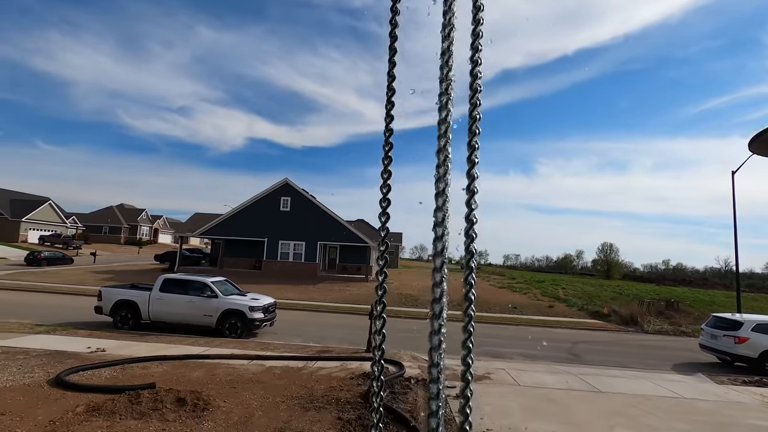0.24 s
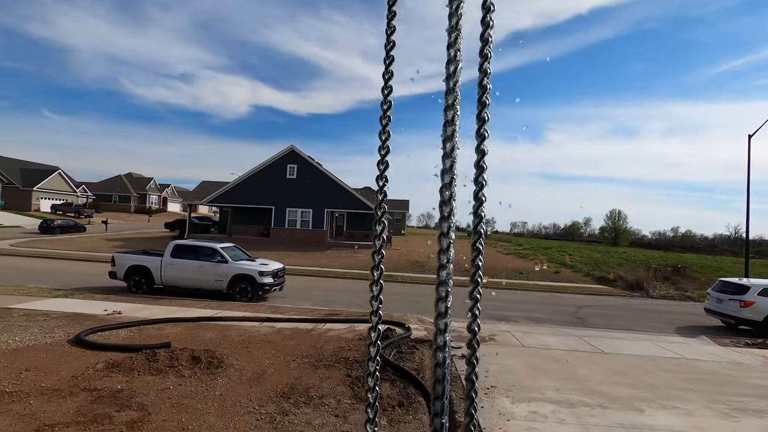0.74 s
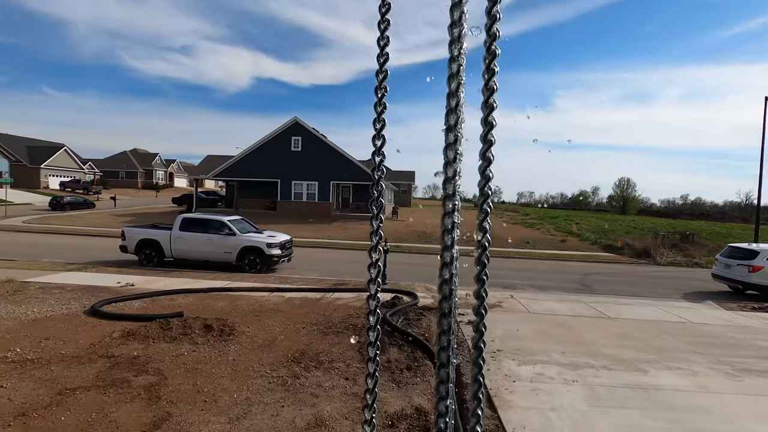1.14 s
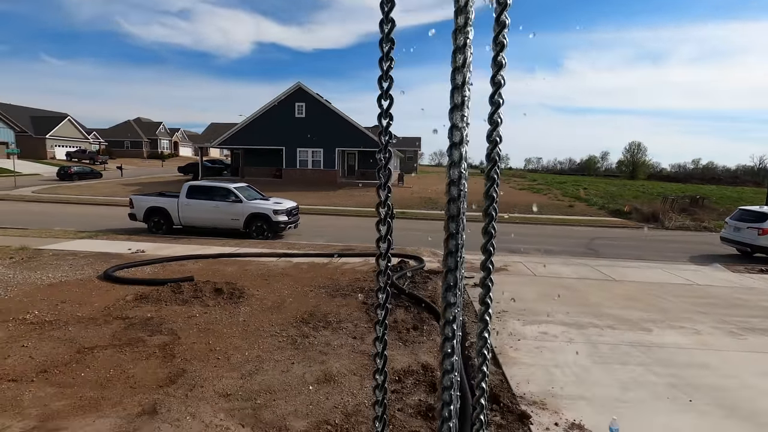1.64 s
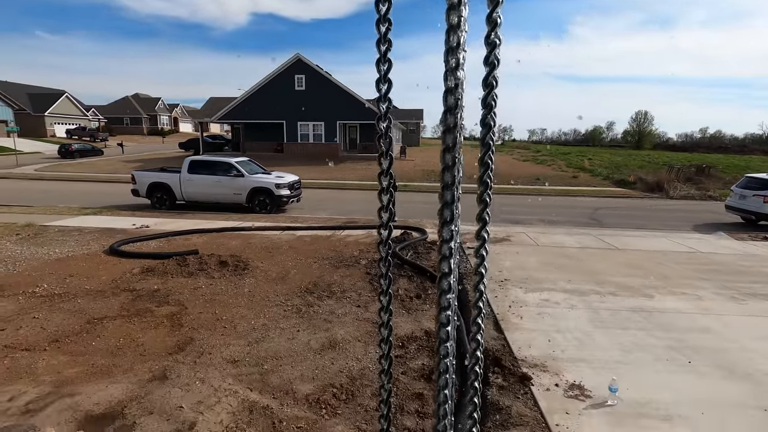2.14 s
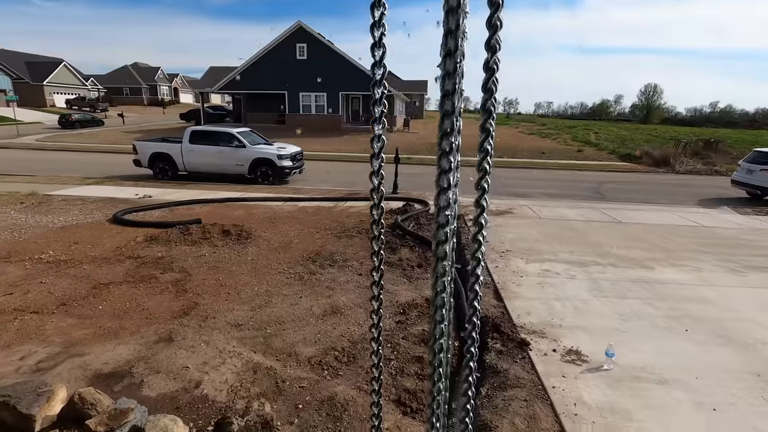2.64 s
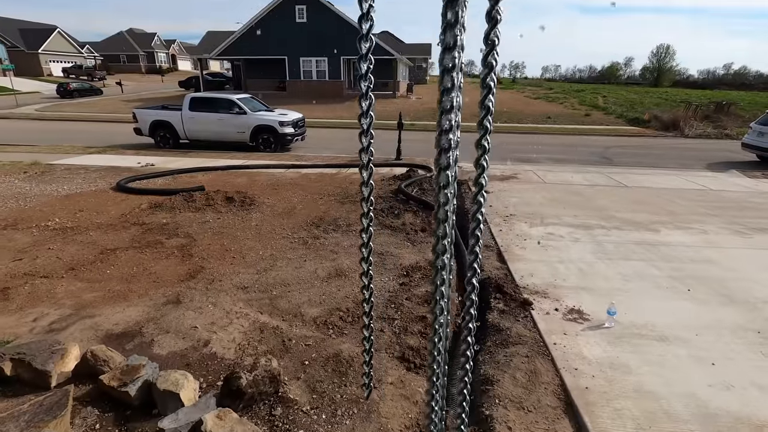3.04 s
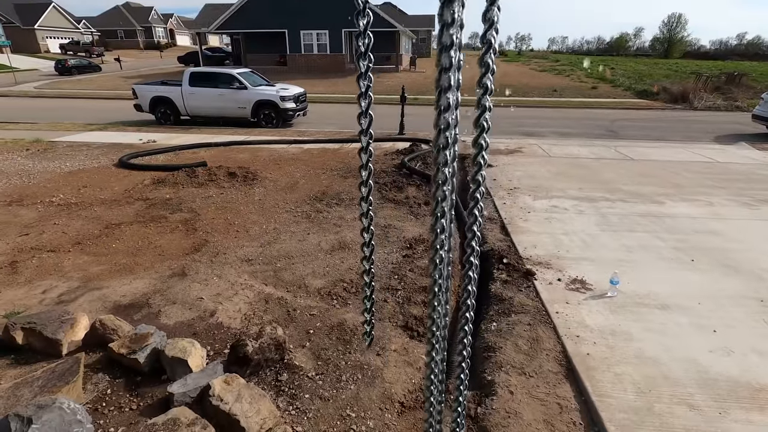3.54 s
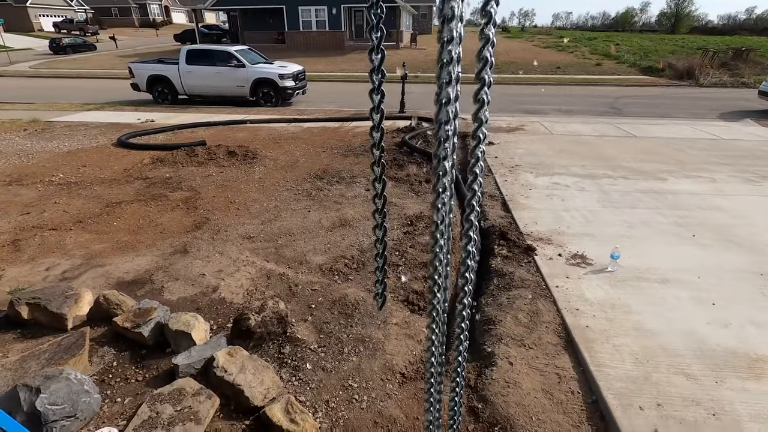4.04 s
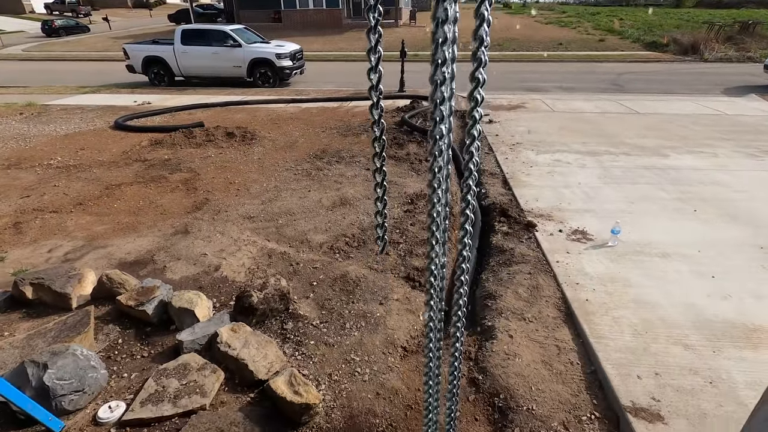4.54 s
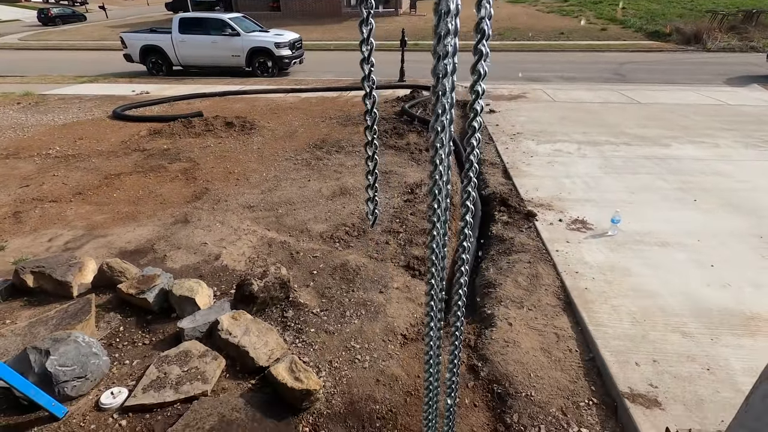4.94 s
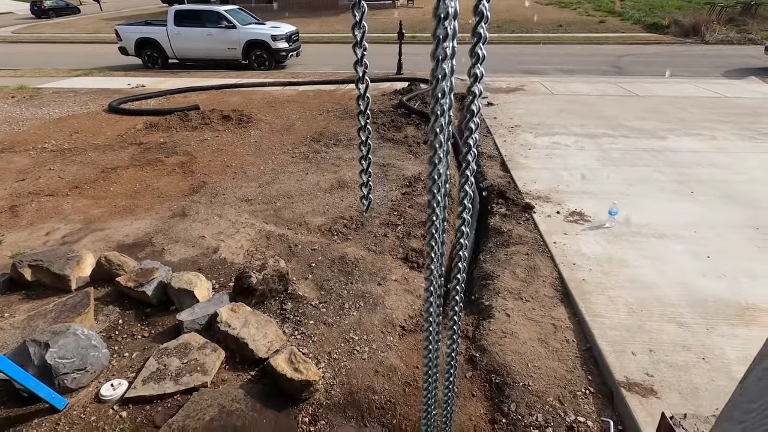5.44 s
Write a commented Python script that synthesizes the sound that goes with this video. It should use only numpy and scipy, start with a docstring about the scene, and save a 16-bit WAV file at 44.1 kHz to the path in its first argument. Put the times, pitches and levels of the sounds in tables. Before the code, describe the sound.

Close watery patter of crisp drop clicks, bubbly plinks and soft hissing spray, a hollow gutter gurgle fading beneath wind bumps.

```python
"""Drops smack on stone, small bubbles plink in puddles, fine spray hisses and a hollow trough gurgles:
water runs from a gutter down hanging chains outdoors, close to a hand-held camera and its microphone.
Drops are clicks with short rings, bubbles are rising tones, spray is filtered ticks, the trough is
splashes through resonances. Spray and trough weaken as the camera tilts down. Wind pushes on the
microphone as low noise and single swings, and a last gust rustles; far splashing lies behind it all."""
import sys
import numpy as np
from scipy import signal
from scipy.fft import rfft, irfft, next_fast_len
from scipy.io import wavfile
from scipy.ndimage import uniform_filter1d

SR = 44100
rng = np.random.default_rng(int(sys.argv[2]) if len(sys.argv) > 2 else 0)


def generate_wav(signal):
    """Clip the signal to [-1, 1] and save it as 16-bit WAV at the path in sys.argv[1]."""
    frames = np.transpose(np.atleast_2d(signal))
    scaled = np.clip(frames, -1, 1) * 32767
    pcm = np.round(scaled).astype(np.int16)
    wavfile.write(sys.argv[1], SR, pcm)


N = 251799


def gain_of(db):
    """Turns decibels into an amplitude factor."""
    return 10 ** (np.asarray(db) / 20)


def evened(x):
    """Scales a sound to rms 1."""
    return x / np.sqrt(np.mean(x ** 2) + 1e-20)


def coloured(x, points):
    """Filters x by (freq_hz, level_db) points joined on a log frequency axis."""
    point_hz, point_db = np.transpose(points)
    size = next_fast_len(len(x))
    hz = np.fft.rfftfreq(size, 1 / SR)
    level_db = np.interp(np.log(hz + 1), np.log(point_hz + 1), point_db)
    return irfft(rfft(x, size) * gain_of(level_db), size)[:len(x)]


def ring(x, hz, width_hz):
    """Passes x through a two-pole resonance of peak gain 1."""
    b, a = signal.iirpeak(hz, hz / width_hz, SR)
    return signal.lfilter(b, a, x)


def wobble(seconds, depth_db):
    """Random level changes of about this length, as a gain with this rms depth."""
    width = max(int(seconds * SR), 2)
    slow = uniform_filter1d(rng.standard_normal(N), width)
    slow = uniform_filter1d(slow, width)
    return gain_of(depth_db * evened(slow))


def taps(per_s, spread_db):
    """Random one-sample clicks, most small and a few large."""
    heights = gain_of(spread_db * np.minimum(rng.exponential(1, N), 4))
    return heights * (rng.random(N) < per_s / SR)


def add(mix, s, sound):
    """Lays a sound into the mix from time s."""
    part = mix[round(s * SR):][:len(sound)]
    part += sound[:len(part)]


def curve(table):
    """Reads a (time_s, value) table for every sample."""
    return np.interp(np.arange(N) / SR, *np.transpose(table))


def swells(s, height, half_s):
    """Adds up bell-shaped swells centred on times s, computed every 64 samples."""
    t = np.arange(0, N + 64, 64) / SR
    bells = height * np.exp(-((t[:, None] - s) / half_s) ** 2)
    return curve(np.transpose([t, bells.sum(1)]))


# spectrum of far splashing and open air: freq_hz [Hz], level_db [relative dB per Hz]
AIR_SPECTRUM = [(35, -29), (60, -1), (172, -0.5), (281, -6.5), (515, 1), (732, -9), (1200, -5.5),
                (1410, -20), (1740, 0.5), (3940, -4.5), (6900, -9.5), (14200, -16.5), (16000, -19)]
AIR_DB = -39  # rms level


def far_air():
    """Splashes too far off to tell apart blend with open air into a steady noise."""
    return gain_of(AIR_DB) * evened(coloured(rng.standard_normal(N), AIR_SPECTRUM))


# how far the camera points down, away from the gutter: time_s [s], tilt [share 0-1]
CAMERA_TILT = [(0, 0), (1.9, 0), (2.3, 0.42), (3.8, 0.67), (4.0, 0.93), (4.8, 0.5), (5.35, 1.0),
               (5.71, 0.96)]
# filter shaping the hiss of droplets: freq_hz [Hz], level_db [relative dB]
SPRAY_COLOUR = [(1470, 12), (2500, 1.5), (4370, -4), (6920, -3.5), (13900, -14), (15200, -8.5),
                (16000, -45)]
SPRAY_DB, SPRAY_LOSS_DB = -36, 5.  # level looking up, and what full tilt takes away


def spray():
    """Thousands of tiny droplets burst each second; low, middle and high ones clump on their own."""
    out = np.zeros(N)
    for hz in (3500, 7000, 12500):
        ticks = taps(per_s=6000, spread_db=2.0) * rng.standard_normal(N)
        ticks = ticks * wobble(0.0072, 2.85) * wobble(0.025, 1.0)
        out += evened(ring(ticks, hz, 0.54 * hz)) * (hz / 7000) ** .5
    level_db = SPRAY_DB - SPRAY_LOSS_DB * curve(CAMERA_TILT)
    return gain_of(level_db) * evened(coloured(out, SPRAY_COLOUR))


# hollow air modes of the gutter: pitch_hz [Hz], width_hz [Hz], level_db [relative dB]
TROUGH_MODES = [(408, 107, 0.5), (558.6, 57, 2), (669.4, 50, 1), (846, 62, 1), (1125, 81, 3.5),
                (1250, 94, 2)]
# surges of gurgling: centre_s [s], rise_db [dB over the steady level], half_s [half length, s]
GURGLE_SURGES = [(.0, 2.5, 0.032), (0.124, 3.5, 0.025), (0.216, 5.5, 0.029), (.53, 6., 0.094),
                 (1.06, 5, .07), (1.536, 4.5, 0.079), (1.906, 6.5, 0.083), (2.55, 3, 0.13), (4.48, 5., .05),
                 (4.837, 8., .035), (5.6, 7.5, .1)]
TROUGH_DB, TROUGH_LOSS_DB = -43, 12.5  # steady level looking up, and what full tilt takes away


def trough():
    """Splashes inside the gutter excite its hollow air modes, with surges of gurgling."""
    splashes = taps(per_s=1400, spread_db=2.0) * rng.standard_normal(N) * wobble(0.035, 1.85)
    hollow = np.zeros(N)
    for hz, width_hz, db in TROUGH_MODES:
        each_hz = 1.68 * width_hz  # two passes together are narrower than each
        mode = ring(ring(splashes, hz, each_hz), hz, each_hz)
        hollow += gain_of(db) * evened(mode)
    hollow = coloured(hollow, [(230, -13), (370, -2.5), (1500, -3)])  # too narrow a trough to sound low
    level_db = TROUGH_DB - TROUGH_LOSS_DB * curve(CAMERA_TILT) + swells(*np.transpose(GURGLE_SURGES))
    return gain_of(level_db) * evened(hollow)


# spectra of slow lumps, flutter and the last rustle: freq_hz [Hz], level_db [relative dB per Hz]
LUMP_SPECTRUM = [(1.2, -37), (2.0, 5), (16, -1.5), (25, -15), (48, -24), (60, -45), (78, -72), (130, -120)]
FLUTTER_SPECTRUM = [(18, -13), (30, -5), (59, -17.5), (92, -20), (135, -17), (198, -36), (300, -39),
                    (390, -65), (660, -120)]
RUSTLE_SPECTRUM = [(47, -33), (80, 0), (156, -3), (369, -15.5), (493, -11), (718, -19), (858, -13),
                   (1820, -7), (2660, -13.5), (7050, -18), (16000, -29)]
# gusts on the microphone, added to the calm level:
# centre_s [s], lumps_db [dB], flutter_db [dB], half_s [half length, s]
MIC_GUSTS = [(0.032, -25.5, -47, 0.08), (.35, -37, -44.5, 0.19), (0.663, -35, -37, 0.069),
             (0.796, -25, -26.5, 0.038), (0.922, -25, -33, 0.066), (1.07, -38, -42, 0.064),
             (1.27, -28, -62, 0.076), (1.596, -37, -47, 0.089), (1.93, -25.5, -44, 0.047),
             (2.253, -29, -39.5, 0.097), (2.633, -22.5, -46.5, 0.079), (2.818, -28, -38, 0.074),
             (3.21, -33.5, -65, 0.05), (3.6, -31, -43, .04), (3.715, -32, -42, 0.037),
             (3.843, -39, -44, .1), (4.5, -34, -57, 0.067), (4.917, -55, -46, 0.037)]
# single pushes: first_peak_s [s], level_db [dB], pitch_hz [Hz], direction [+1 dips first, -1 rises first]
MIC_PUSHES = [(0.666, -20, 37, 1), (0.777, -9, 41, 1), (0.835, -17.5, 30, 1), (0.944, -26, 65, 1),
              (1.051, -33, 130, 1), (3.0874, -25.5, 310, 1), (3.094, -27.5, 114, -1), (4.923, -26, 123, 1),
              (4.935, -32, 120, 1), (5.619, -17.5, 63, 1), (5.636, -17, 152, -1), (5.637, -12.5, 13, -1)]
CALM_LUMPS_DB, CALM_FLUTTER_DB = -37.5, -51.5
RUSTLE_S, RUSTLE_ATTACK_S = 5.614, 0.0043
RUSTLE_DB, RUSTLE_FADE_DB_PER_S = -26, 62  # level before the fade, which runs from the start


def push(hz, direction):
    """Air shoves the microphone one way, back the other, then swings out."""
    turns = np.arange(0, 3, hz / SR)
    swing = np.sin(2 * np.pi * turns) * 2.78 * turns * np.exp(-1.9 * turns ** 2)
    return -np.sign(direction) * swing


def wind():
    """Air pressure on the microphone: slow lumps, faster flutter, single pushes and a last rustle."""
    lumps, flutter, rustle = rng.standard_normal((3, N))
    s, lumps_db, flutter_db, half_s = np.transpose(MIC_GUSTS)
    lumps_gain = gain_of(CALM_LUMPS_DB) + swells(s, gain_of(lumps_db), half_s)
    out = lumps_gain * evened(coloured(lumps, LUMP_SPECTRUM))
    flutter_gain = gain_of(CALM_FLUTTER_DB) + swells(s, gain_of(flutter_db), half_s)
    out += flutter_gain * evened(coloured(flutter * wobble(0.021, 3.4), FLUTTER_SPECTRUM))

    # the last gust rustles over the camera
    t = np.maximum(np.arange(N) / SR - RUSTLE_S, 0)
    shape = np.minimum(t / RUSTLE_ATTACK_S, 1) * gain_of(RUSTLE_DB - RUSTLE_FADE_DB_PER_S * t)
    out += shape * evened(coloured(rustle * wobble(0.0034, 2.5), RUSTLE_SPECTRUM))

    for peak_s, db, hz, direction in MIC_PUSHES:
        add(out, peak_s - 0.32 / hz, gain_of(db) * push(hz, direction))
    return out


def smack(hz, click_db, ring_s, fizz_db, noise):
    """A sharp click, a few cycles as the drop flattens, two near echoes and a fizz of splinters."""
    t = np.arange(len(noise)) / SR
    cycles = (t - .001) * 10500
    click = -np.cos(2 * np.pi * cycles) * np.exp(-1.8 * cycles ** 2)
    late = np.maximum(t - .0007, 0) / ring_s
    flattening = np.sin(2 * np.pi * hz * t) * late * np.exp(1 - late)
    blow = gain_of(click_db) * click + flattening
    first_echo = gain_of(-9.) * np.roll(blow, round(0.00105 * SR))
    second_echo = gain_of(-17.) * np.roll(blow, round(0.0082 * SR))

    bright = evened(ring(noise, 9400, 9600))
    tuned = evened(ring(ring(noise, hz, 0.75 * hz), hz, 0.75 * hz))
    fizz = tuned + 0.68 * gain_of(click_db) * bright  # clickier drops fizz brighter
    fizz_gain = gain_of(fizz_db - 60 * t / 0.097) * np.clip((t - .001) / 0.00084, 0, 1)
    return blow + first_echo + second_echo + fizz_gain * fizz


# clearest drops on stone: start_s [s], level_db [dB], pitch_hz [Hz], click_db [click against the ring, dB]
STONE_DROPS = [(.0424, -22, 6400, 3.5), (.0544, -20, 4500, 3), (.2304, -27, 12100, -4),
               (.3077, -20.5, 6300, 3), (.3182, -25, 12900, -7), (.357, -21, 8500, -7),
               (.3945, -26, 9860, -4), (.4978, -23, 4640, 4), (1.3329, -24, 7070, -1),
               (1.3528, -24, 4080, 8), (1.3813, -18, 5000, -6), (1.4172, -26, 9180, 2),
               (1.485, -20, 6560, -12), (1.6018, -27, 13500, -7), (1.7334, -22, 8340, -6),
               (1.7404, -19.5, 8700, -4), (1.7723, -23, 7560, -2), (1.7963, -13.5, 5260, -3),
               (1.8188, -23, 11700, -2), (1.8956, -26, 12400, -4), (1.9445, -4, 5250, -25),
               (2.2019, -22, 6780, -2), (2.2992, -23.5, 7540, 5), (2.4179, -26, 6200, 9),
               (2.593, -24, 8060, -9), (2.6758, -21, 6660, -13), (2.813, -18.5, 8750, -8),
               (2.8569, -28, 7800, 9), (2.8958, -22, 7360, 1), (2.9392, -26, 9350, -7),
               (3.051, -22, 8200, -12), (3.1078, -27, 13400, -6), (3.1462, -20, 5300, -2),
               (3.1994, -23, 6460, 3), (3.3358, -27, 8820, 1), (3.4326, -27, 9300, 2),
               (3.5768, -15, 6600, -1), (3.593, -19.5, 6930, 4), (3.6277, -19, 6900, -2),
               (3.6364, -24, 6790, -4), (3.6494, -24, 5610, -2), (3.6905, -11.5, 6470, 4),
               (3.7209, -19, 6860, 5), (3.7409, -16.5, 9020, 5), (3.8387, -22.5, 6900, 7.5),
               (3.8404, -27, 12500, 2), (3.932, -22, 5950, -11), (4.3515, -16, 6200, 4),
               (4.4717, -29, 4610, 12), (4.4894, -26, 6910, 3), (4.5306, -12.5, 7160, -6),
               (4.6054, -29.5, 7450, 13), (4.6887, -23.5, 6500, 1), (5.003, -18, 7400, 1),
               (5.007, -21, 7230, 0), (5.0338, -18, 7750, 5.5), (5.6165, -21.5, 6460, -10),
               (5.6304, -18, 6020, -4), (5.6785, -23, 4000, 1)]
RING_S = 0.00022  # time for the ring to swell to its peak
FIZZ_DB, FIZZ_PER_DB = -19.5, -0.08  # fizz against the ring at 0 dB; it gains as drops get quieter


def smacks():
    """The clearest drops hit stone over a random patter of smaller, farther ones with little click."""
    out = np.zeros(N)
    noises = rng.standard_normal((len(STONE_DROPS), 3000))
    for (s, db, hz, click_db), noise in zip(STONE_DROPS, noises):
        add(out, s, gain_of(db) * smack(hz, click_db, RING_S, FIZZ_DB + FIZZ_PER_DB * db, noise))
    for hz in np.geomspace(4500, 14000, num=14):
        one = smack(hz, -26, 0.00031, -16.5, rng.standard_normal(3000))
        patter = signal.oaconvolve(taps(per_s=5, spread_db=3.), one)[:N]
        out += gain_of(-32.5) * (4500 / hz) ** 0.91 * patter
    return out


def bubble(hz, t60, rise):
    """A small air pocket rings and climbs in pitch as it nears the surface."""
    t = np.arange(2000) / SR
    tone = np.sin(2 * np.pi * hz * t * (1 + rise * t / t60))
    return tone * (1 - np.exp(-t / 0.00038)) * gain_of(-60 * t / t60)


# level of the dense puddle bubbles: time_s [s], level_db [dB]
BUBBLING_LEVEL = [(0, -43), (.2, -40.5), (.3, -41), (.95, -41.5), (1.08, -37), (1.2, -43), (1.53, -36.5),
                  (1.74, -38.5), (2.78, -39), (3.82, -42.5), (3.98, -39), (4.06, -43.5), (4.9, -39),
                  (5.35, -43), (5.6, -40)]
# single bubbles that stand out: start_s [s], level_db [dB], pitch_hz [Hz]
SINGLE_PLINKS = [(.099, -23.5, 774), (.192, -23, 696), (.204, -24, 2340), (.222, -26, 565),
                 (.244, -25, 3530), (.295, -23.5, 3200), (.426, -26, 1130), (0.463, -26, 1170),
                 (0.518, -26, 1340), (0.58, -26, 1130), (.699, -28, 1070), (.819, -20.5, 2270),
                 (1.236, -24, 2280), (1.347, -23, 2180), (1.483, -25, 1990), (1.714, -26, 2140),
                 (1.864, -29, 1990), (2.208, -24.5, 3400), (2.282, -26, 1730), (2.381, -26, 1730),
                 (2.382, -27, 1110), (2.497, -30, 1070), (2.535, -27, 1330), (2.69, -28, 1080),
                 (2.705, -30, 1010), (2.796, -26, 1600), (2.4, -20.5, 1880), (2.474, -26, 2090),
                 (2.624, -28, 1640), (3.061, -22.5, 1950), (3.322, -24.5, 2690), (3.624, -25, 1300),
                 (3.994, -25, 1680), (4.021, -27, 1640), (4.223, -26, 1650), (4.431, -22, 1670),
                 (4.458, -27, 1290), (4.512, -26, 2280), (4.59, -26, 1620), (4.83, -28, 1300),
                 (4.756, -26, 1890), (4.978, -25, 1610), (5.051, -22, 1610), (5.2, -24, 1680),
                 (5.617, -20.5, 1480)]
COMMON_HZ, COMMON_SINK_HZ = 2204, 500  # the commonest bubble pitch sinks with the tilt
PLINK_T60_S = 0.029


def puddles():
    """Dense small bubbles ring around a favourite size, and single ones stand out."""
    out = np.zeros(N)
    common_hz = COMMON_HZ - COMMON_SINK_HZ * curve(CAMERA_TILT)
    for hz, (t60_draw, rise_draw) in zip(np.geomspace(1500, 4200, num=40), rng.random((40, 2))):
        t60 = (0.011 + 0.024 * t60_draw) * (1800 / hz) ** .5  # small ones die sooner
        one = bubble(hz, t60, 0.19 * rise_draw)
        share = 0.68 + np.exp(-(np.log(hz / common_hz) / 0.31) ** 2)
        out += signal.oaconvolve(share * taps(per_s=28, spread_db=3.2), one)[:N]
    out = gain_of(curve(BUBBLING_LEVEL)) * evened(out * wobble(0.0094, 2.06))
    for s, db, hz in SINGLE_PLINKS:
        add(out, s, gain_of(db) * bubble(hz, PLINK_T60_S, 0.04))
    return out


def scene():
    """One microphone feeds both channels."""
    heard = far_air() + spray() + trough() + wind() + smacks() + puddles()
    return np.tile(heard, (2, 1))


def record(dry):
    """A steep low-pass at 15850 Hz limits the band."""
    lowpass = signal.firwin(511, 15850, window=("kaiser", 9), fs=SR)
    return signal.oaconvolve(dry, lowpass[None], "same")


dry = scene()
out = record(dry)
generate_wav(out)
```